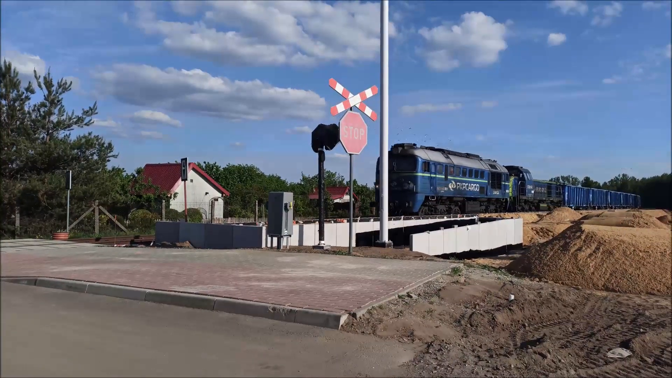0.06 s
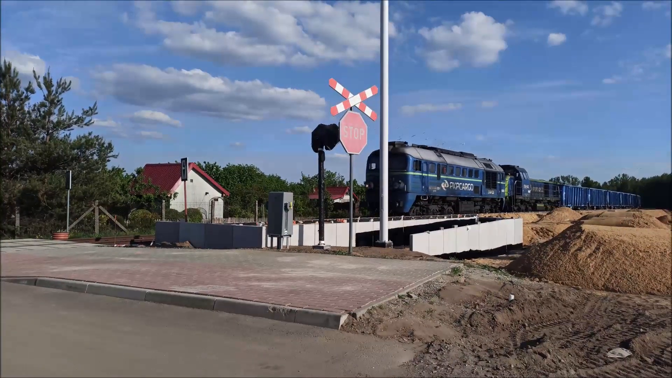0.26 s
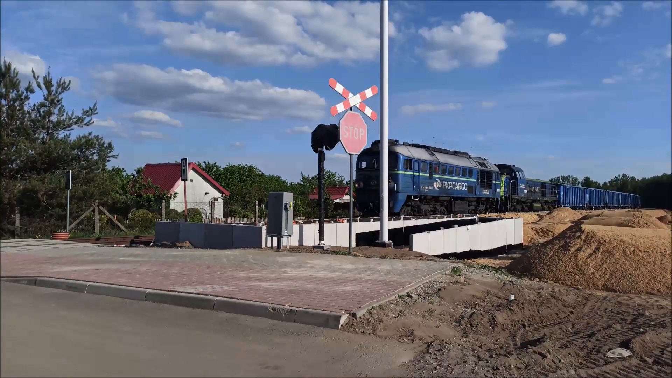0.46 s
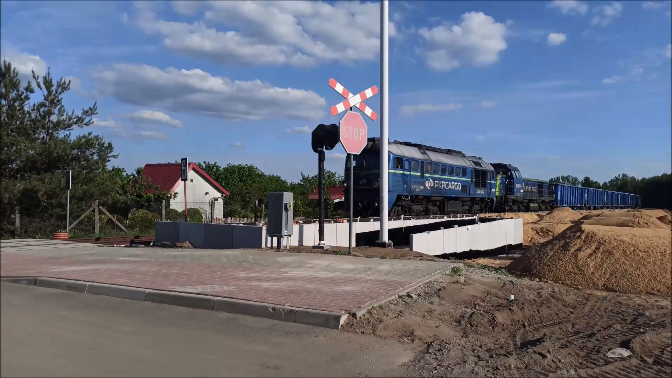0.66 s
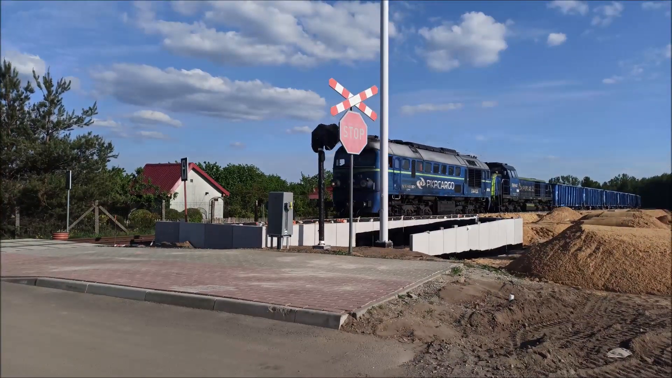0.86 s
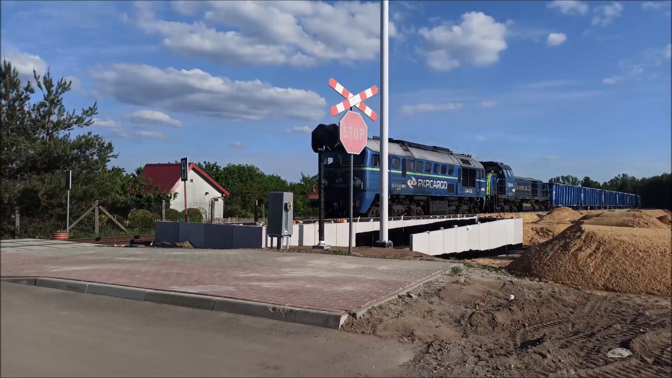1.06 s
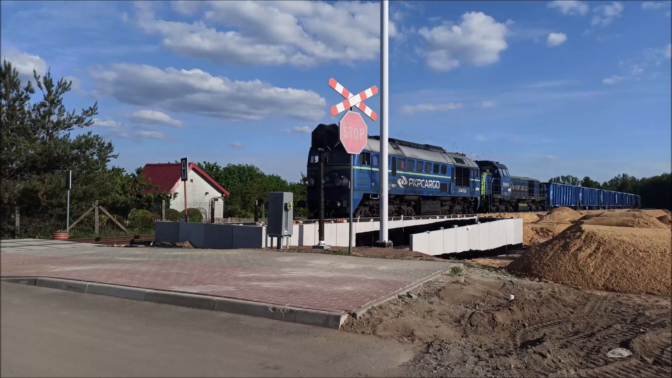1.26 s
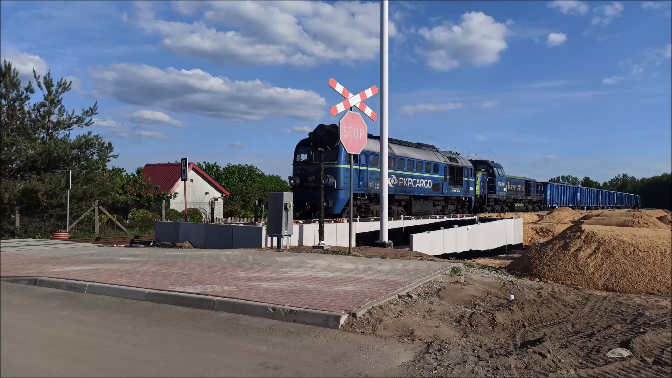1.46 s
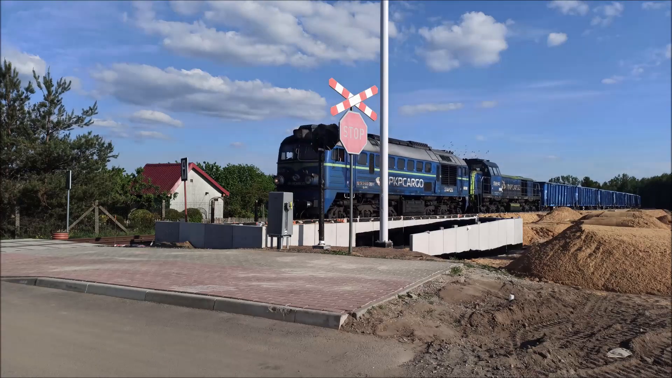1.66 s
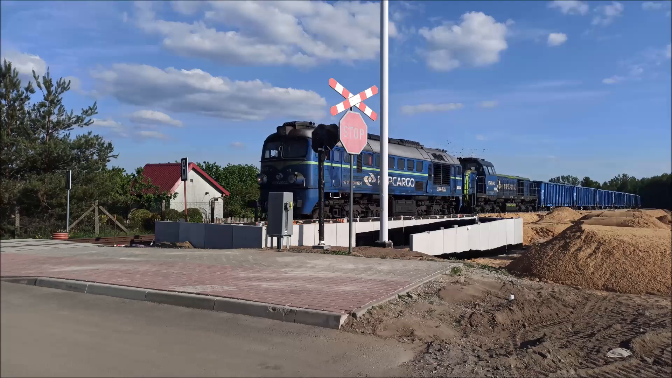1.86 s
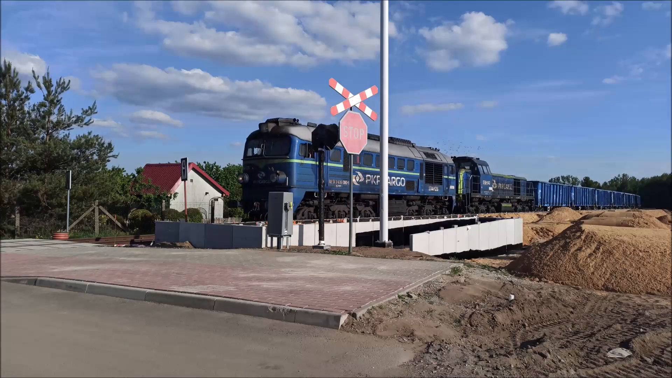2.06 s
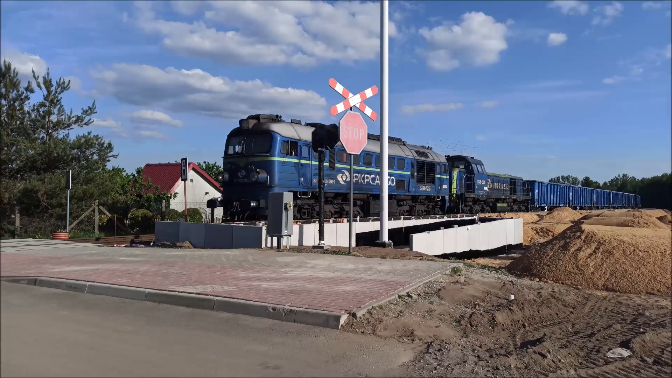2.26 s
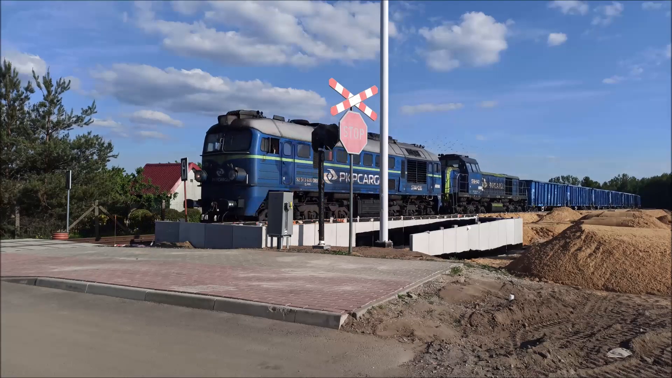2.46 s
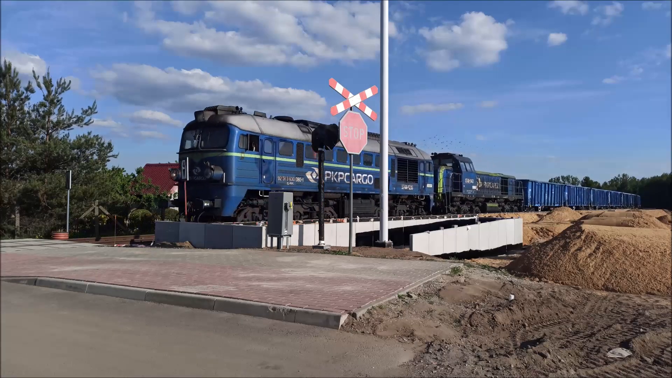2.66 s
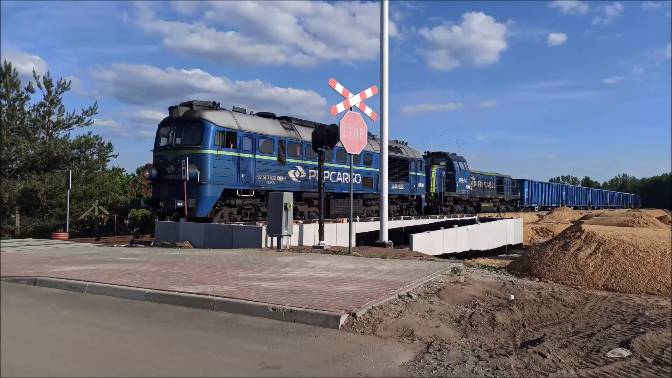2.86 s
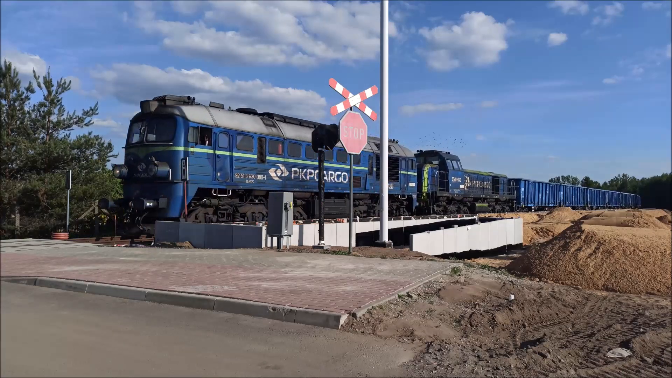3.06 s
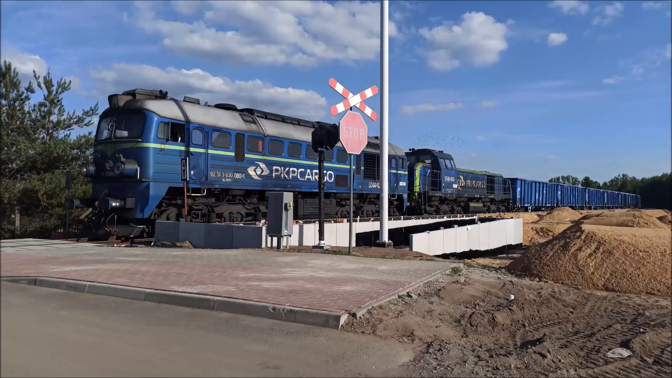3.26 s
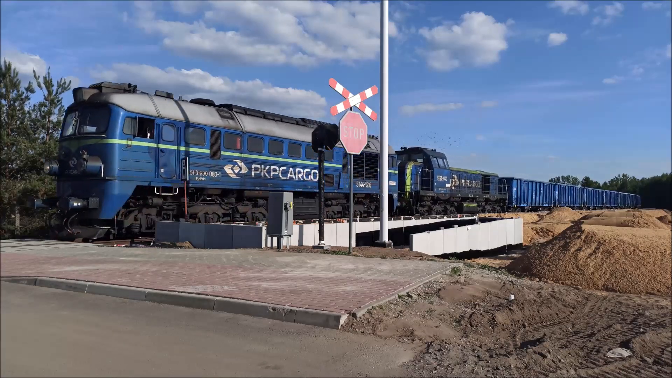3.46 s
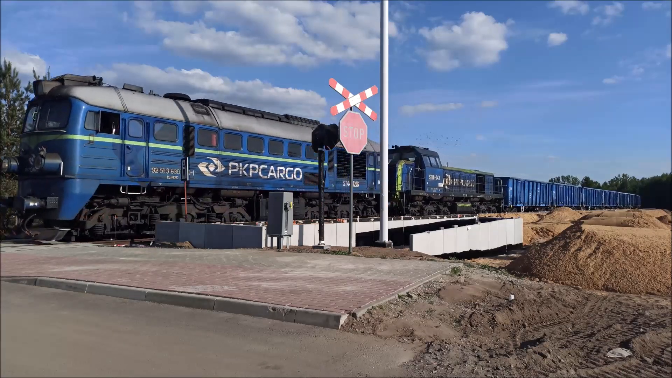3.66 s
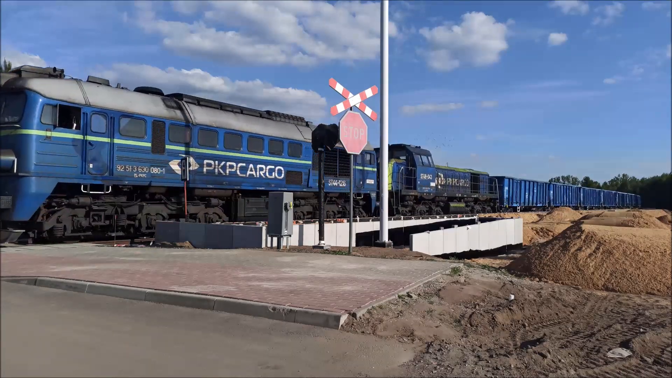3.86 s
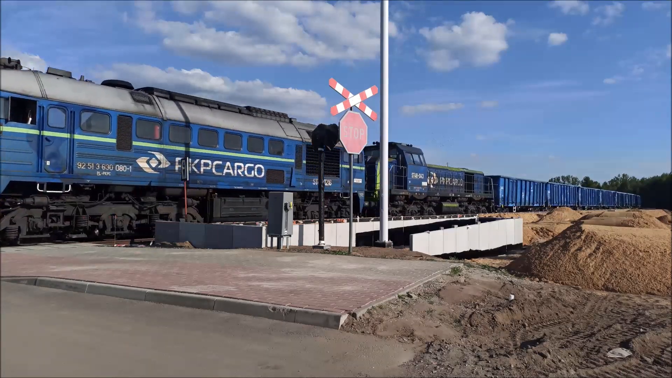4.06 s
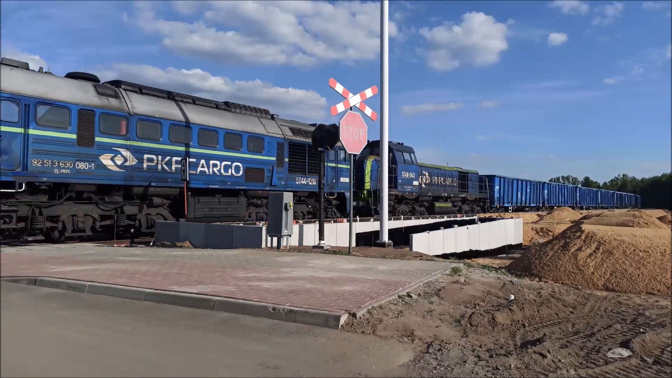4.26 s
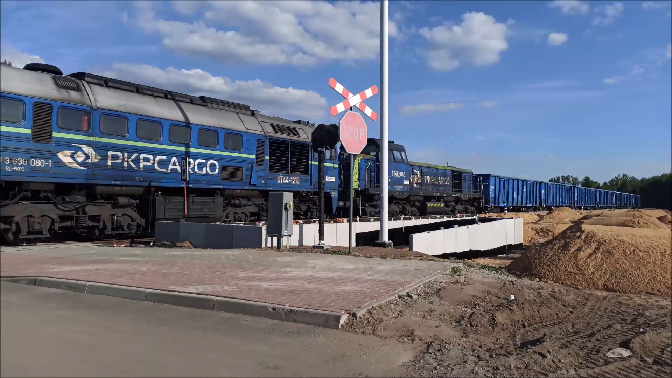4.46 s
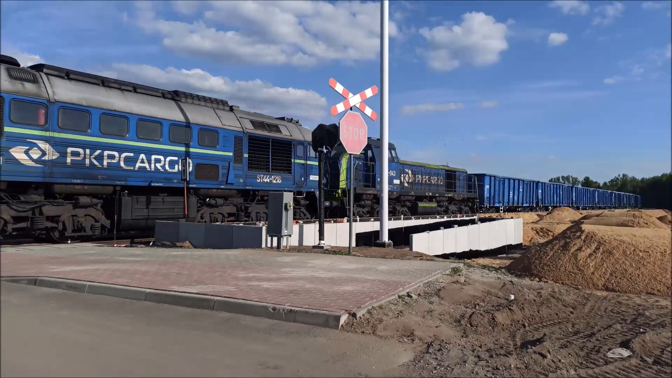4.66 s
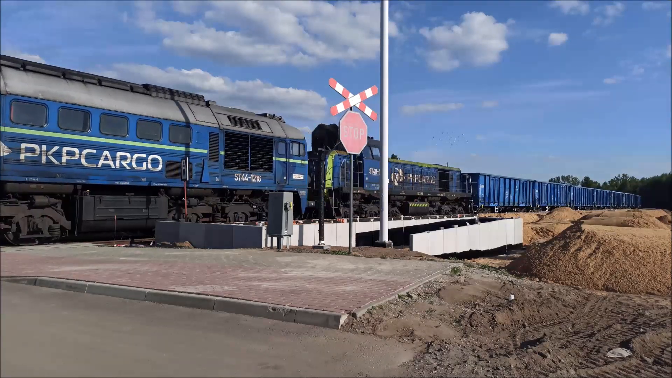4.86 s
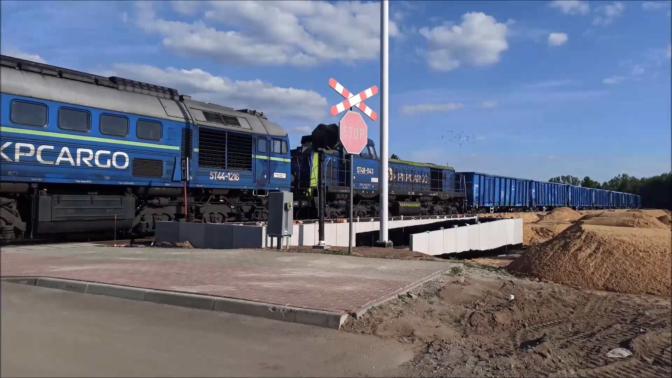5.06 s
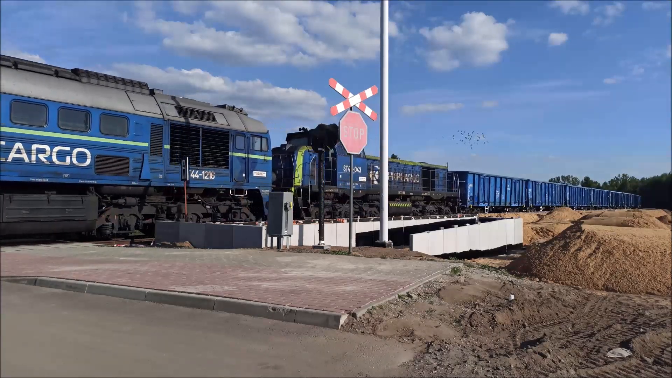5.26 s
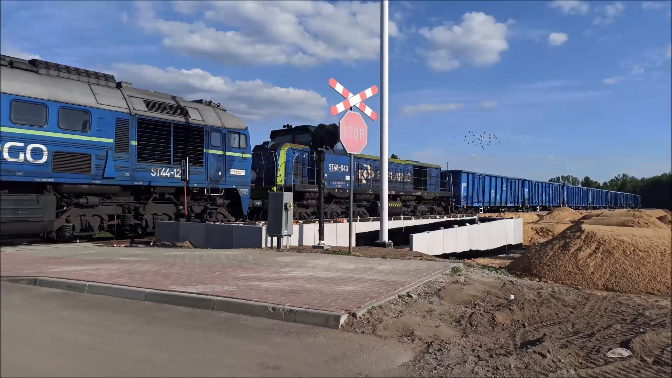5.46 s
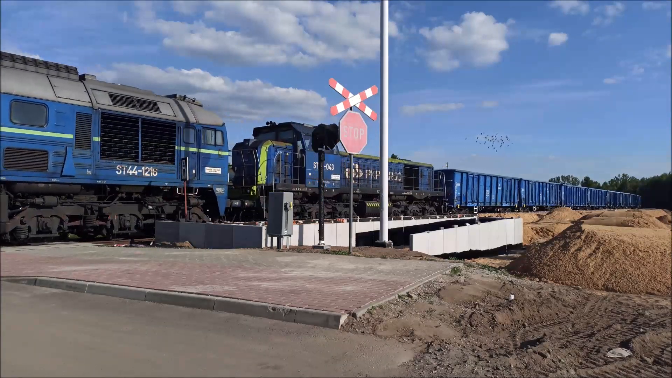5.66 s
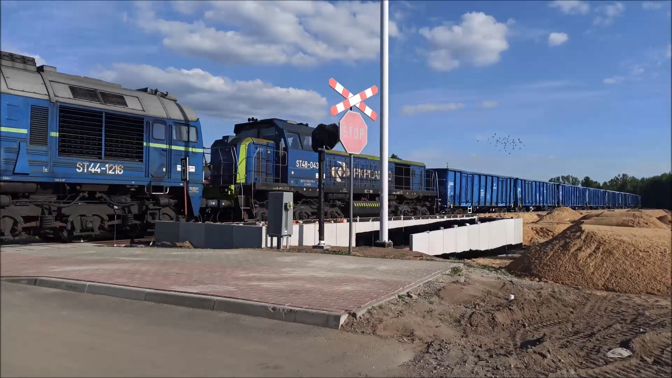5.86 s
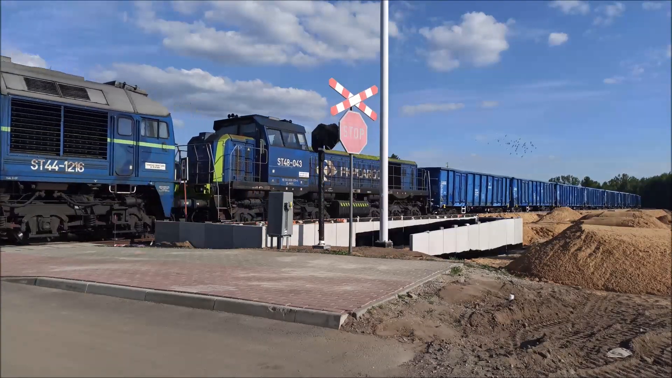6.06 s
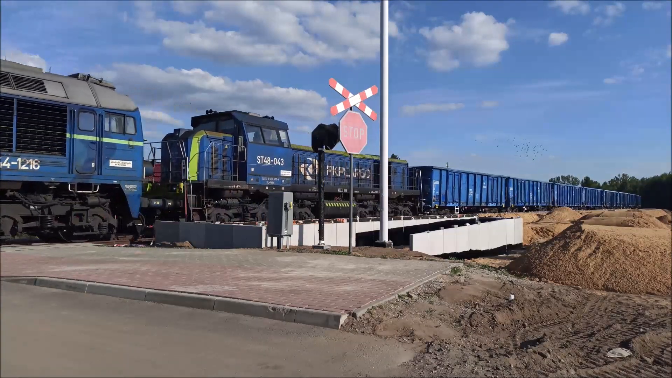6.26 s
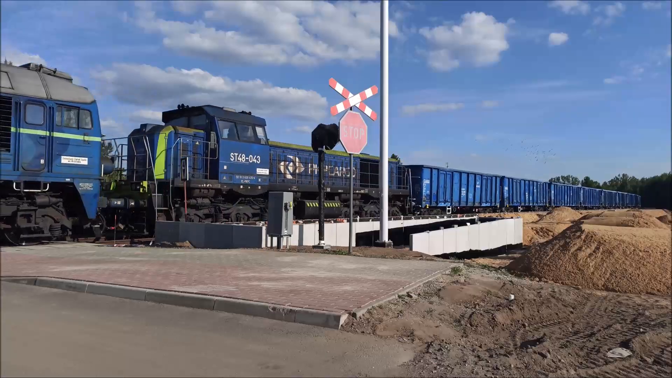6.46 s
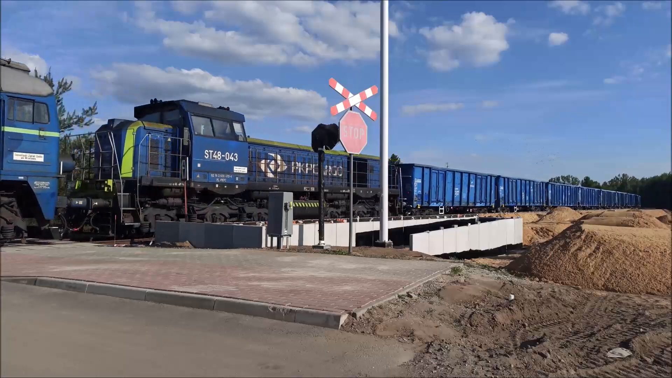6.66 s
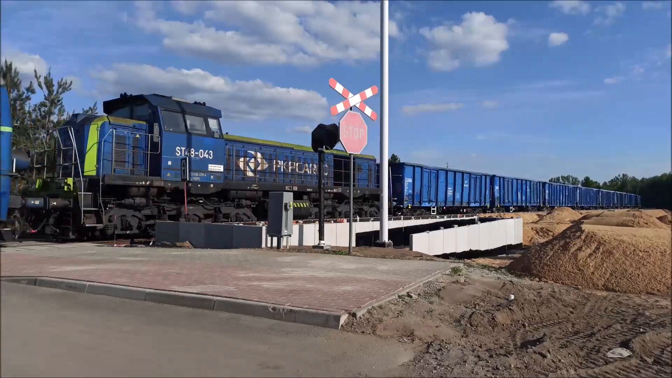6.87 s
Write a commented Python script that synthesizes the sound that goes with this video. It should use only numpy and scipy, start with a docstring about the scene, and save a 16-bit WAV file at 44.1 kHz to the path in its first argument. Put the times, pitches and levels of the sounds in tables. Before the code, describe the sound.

A diesel freight train approaches a level crossing, its low engine drone swelling into a heavy throbbing rumble with rolling wheels, dry ticks and faint rail squeaks.

```python
"""A level crossing: a diesel freight train draws near and rolls past from right to left, heard on a phone.
Exhaust rumble, body drone, rolling wheels and fan hiss are shaped noises that swell as their distance shrinks.
Wavering sines make the firing tone, the boom and the hums; narrow noise makes a panel ring.
Dry ticks (noise bursts through modes) and a faint high whistle from the rails (narrow noise) sit on top,
over a steady hiss and breeze."""
import sys
import numpy as np
from scipy import signal
from scipy.fft import rfft, irfft, next_fast_len
from scipy.io import wavfile
from scipy.ndimage import uniform_filter1d, map_coordinates

SR = 44100
rng = np.random.default_rng(int(sys.argv[2]) if len(sys.argv) > 2 else 0)


def magnitude_from_level(level_db):
    """Linear magnitude for a level in decibels (20 dB per decade)."""
    exponent = np.asarray(level_db, float) / 20
    return 10 ** exponent


def store_pcm(level_fs):
    """Save levels as 16-bit WAV."""
    pcm = np.round(np.clip(level_fs, -1, 1) * 32767).astype(np.int16)
    wavfile.write(sys.argv[1], SR, np.atleast_2d(pcm).T)


N = 305172
T = np.arange(N) / SR
SIZE = next_fast_len(N)
HZ = np.maximum(np.fft.rfftfreq(SIZE, 1 / SR), 1)


def columns(table):
    """Columns of a table, one value per sample, and a gate that is shut outside its span."""
    s, *rest = np.transpose(table)
    gate = np.clip(np.minimum(T - s[0] + 0.03, s[-1] + 0.051 - T) * 10, 0, 1)
    return [np.interp(T, s, c) for c in rest] + [gate]


def over_hz(points):
    """Table values at every FFT bin, interpolated over log frequency."""
    hz, value = np.transpose(points)
    return np.interp(np.log(HZ), np.log(hz), value)


def shape(x, gain):
    """Zero-phase filter: scales the spectrum by a gain per bin."""
    return irfft(rfft(x, SIZE) * gain, SIZE)[..., :N]


def unit(x):
    """Scales to an rms of 1."""
    return x / np.sqrt(np.mean(x ** 2))


def walk(rate_hz):
    """Random levels held 1 / rate_hz and slewed twice; spread near 1."""
    hold = int(SR / rate_hz)
    steps = np.repeat(rng.standard_normal(N // hold + 1), hold)
    slewed = uniform_filter1d(uniform_filter1d(steps, hold), hold)
    return 1.51 * slewed[:N]


def swell(start_s, end_s):
    """Rises from silence and falls back between two moments."""
    return np.sin(np.pi * np.clip((T - start_s) / (end_s - start_s), 0, 1)) ** 1.3


def narrow_noise(hz, rate_hz):
    """Noise in a narrow band: a carrier times a slow complex random walk."""
    slow = walk(rate_hz) + 1j * walk(rate_hz)
    return np.real(slow * np.exp(2j * np.pi * np.cumsum(hz + 0 * T) / SR))


def tone(hz, db, waver_db, rate_hz):
    """A sine whose level and phase waver."""
    waver_rad = 0.35
    level = np.sqrt(2) * magnitude_from_level(db + waver_db * walk(rate_hz))
    return level * np.sin(2 * np.pi * np.cumsum(hz) / SR + waver_rad * walk(rate_hz))


def air():
    """Steady hiss of open air and microphone, and low breeze rumble, unrelated in the two ports."""
    # hiss colour: (frequency [Hz], relative level per Hz [dB])
    hiss_colour = [(1500, -23.5), (3000, -0.5), (8000, -10.5), (12000, 3.5), (16000, 7.5)]
    # breeze colour: (frequency [Hz], relative level per Hz [dB])
    breeze_colour = [(30, -23), (60, -5.5), (110, 4), (200, -11.5), (400, -24.5), (800, -53.5)]
    out = 0
    for colour, rms_db in [(hiss_colour, -63), (breeze_colour, -43.5)]:
        noise = rng.standard_normal((2, N))
        out = out + magnitude_from_level(rms_db) * unit(shape(noise, magnitude_from_level(over_hz(colour))))
    return out


def whistle():
    """Rail whistles and squeaks: fluttering patches of narrow noise, from the right."""
    # patches: (start [s], end [s], centre [Hz], peak before flutter and pan [dB])
    patch_table = [(2.02, 2.13, 14800, -50), (3.24, 3.5, 14900, -59), (3.72, 4.1, 14800, -44),
                   (3.8, 4.05, 5750, -60), (5.1, 5.18, 14600, -43), (5.222, 5.308, 14800, -48),
                   (5.796, 6.144, 14600, -51), (5.815, 5.84, 5800, -44), (6.197, 6.723, 14700, -44)]
    patches = sum(magnitude_from_level(db) * swell(start, end) * narrow_noise(hz, 500) for start, end, hz, db in patch_table)
    left_minus_right_db, flutter_db = -13, 3.5
    pan_db = np.array([[left_minus_right_db], [-left_minus_right_db]]) / 2
    return patches * magnitude_from_level(flutter_db * walk(40) + pan_db)


def ticks():
    """Dry cracks with a short noisy tail, through one set of modes; some ring lower than others."""
    # ticks; the soft ones are all tail:
    # (time [s], drive [dB], extra drive of the low modes [dB], left minus right [dB])
    tick_table = [(0.0553, -16.5, -2, 5.5), (0.0642, -32.5, 8, 4), (0.1278, -38, 8, 1), (2.2277, -36, 4, 8),
                  (2.2546, -40, -8, 6), (2.9617, -53, 23, -2), (2.972, -48, 20, 2), (3.0104, -50, 22, 4),
                  (3.052, -49, 21, 3), (3.5712, -30.5, 1, 5), (4.884, -30, -5, 6), (4.9105, -22, -5, 6.5),
                  (4.914, -26, -3, 9), (4.9274, -32, -3, 8), (4.952, -27.5, -4, 7),
                  (4.9813, -26.5, -16, 13.5), (4.987, -20, -4, -1), (4.9993, -19, -1, 6),
                  (5.0104, -27, -1, 1.5), (5.8627, -24, -3, 5)]
    # modes: (frequency [Hz], width [Hz], gain [dB])
    modes = [(2680, 300, -4), (3650, 330, 6.5), (4300, 630, 2), (6800, 490, 0.5), (7450, 640, 8),
             (8700, 390, -0.5), (11800, 2000, 0), (14500, 4000, 4.5)]
    soft_below_db, hard_t60_s, soft_t60_s = -45, 0.037, 0.079
    attack_s, crack_decay_s = 0.00028, 0.00061
    t = np.arange(4000) / SR
    drive = np.zeros((2, 2, N))  # low or high modes, port, sample
    for s, db, low_db, pan_db in tick_table:
        hard = db > soft_below_db
        t60_s = hard_t60_s if hard else soft_t60_s
        tail = 0.5 * np.exp(-t * np.log(1000) / t60_s)
        envelope = np.minimum(t / attack_s, 1) * (hard * np.exp(-t / crack_decay_s) + tail)
        grain = rng.standard_normal((3, len(t)))
        partly_shared = 0.65 * grain[0] + 0.83 * grain[1:]
        hit = magnitude_from_level(db + np.array([[pan_db], [-pan_db]]) / 2) * envelope * partly_shared
        first = int(s * SR)
        drive[..., first:first + len(t)] += np.array([hit * magnitude_from_level(low_db), hit])
    out = 0
    for hz, width_hz, db in modes:
        b, a = signal.iirpeak(hz, hz / width_hz, SR)
        out = out + magnitude_from_level(db) * signal.lfilter(b, a, drive[int(hz > 5000)])
    return out


def resonance():
    """The ringing panel: narrow noise that swells once."""
    return swell(5.17, 6.21) * magnitude_from_level(-30) * narrow_noise(658, 90)


def hums():
    """Machinery tones that come and go, and one that climbs in pitch and level."""
    # strands: (start [s], end [s], frequency [Hz], peak before waver [dB])
    strands = [(-.3, 1.6, 71.5, -37), (1.4, 3.4, 71, -35), (-.3, 1.3, 318.5, -41), (1.6, 2.9, 378, -38),
               (2.6, 3.4, 318, -36), (3.2, 4.0, 140, -33), (3.9, 4.7, 152, -31), (3.2, 3.95, 318, -33),
               (-.2, .6, 1445, -52), (1.3, 2.6, 1430, -50), (1.6, 2.1, 1608, -50), (4.1, 4.95, 910, -44),
               (4.4, 5.0, 1175, -44), (4.5, 5.3, 364.5, -32), (4.8, 5.25, 320, -30), (5.15, 5.55, 404, -29),
               (5.3, 5.5, 331, -31), (5.4, 6.05, 705, -31), (5.45, 5.9, 205.5, -28), (5.5, 5.9, 600, -34),
               (5.55, 5.9, 1090, -42), (5.85, 6.35, 1152, -41), (6.1, 6.9, 552.5, -36),
               (6.35, 6.65, 941, -34), (6.55, 7.1, 2400, -45), (6.7, 7.1, 778, -35)]
    since_s = T - 5.5
    climb_hz = np.clip(337 + 66 * since_s, 337, 424)
    climb_db = -32 + 3.5 * since_s
    fade_s = 0.2
    out = np.clip(since_s / fade_s, 0, 1) * tone(climb_hz, climb_db, 2.8, 11)
    for start, end, hz, db in strands:
        out += swell(start, end) * tone(hz + 0 * T, db, 1.4, 11)
    return out


def firing():
    """The firing tone with the even multiples that the body lets through, and the boom just below it."""
    # levels before waver: (time [s], firing tone [dB], 2nd multiple [dB], 4th multiple [dB])
    firing_levels = [(5.95, -50, -40, -42), (6.18, -40, -21.5, -26), (6.34, -22, -21, -30),
                     (6.46, -22, -21, -28), (6.57, -15.5, -30, -24), (6.68, -14, -24, -27),
                     (6.78, -20, -21, -26), (6.92, -38, -30, -36)]
    # deep exhaust boom: (time [s], frequency [Hz], level before waver [dB])
    boom_track = [(4.95, 108, -34), (5.17, 107, -19), (5.3, 104.5, -18.5), (5.6, 108.5, -20.5),
                  (5.82, 108.5, -17.5), (5.96, 104, -36), (6.08, 101, -21), (6.2, 101.5, -20),
                  (6.3, 104, -30)]
    first_db, second_db, fourth_db, gate = columns(firing_levels)
    hz = 110.6 + 0 * T
    multiples = tone(hz, first_db, 0.6, 8)
    multiples += tone(2 * hz, second_db, 0.6, 6)
    multiples += tone(4 * hz, fourth_db, 1.2, 8)
    boom_hz, boom_db, boom_gate = columns(boom_track)
    return gate * multiples + boom_gate * tone(boom_hz, boom_db, 1.6, 12)


def arriving_noise():
    """Rows: the direct wave, then scattered sound for the left and right port."""
    # power share that arrives scattered, unlike in the two ports: (frequency [Hz], share [0-1])
    scatter = [(100, 0.01), (300, 0.03), (700, 0.15), (1400, 0.56), (3000, 0.96), (8000, 0.89)]
    share = np.clip(over_hz(scatter), 0, 1)
    return shape(rng.standard_normal((3, N)), np.sqrt([1 - share, share, share]))


def passing_db():
    """Level of each broad source as its distance shrinks; rumble and drone surge on top."""
    # exhaust rumble, body drone, wheels, fans:
    # (closest [s], level then before surges [dB], distance then [m], loss per tenfold distance [dB])
    sources = [(5.7, -26, 4.45, 20.1), (6.1, -25.5, 4.38, 30.3), (6.5, -28, 5.45, 22.4),
               (6.6, -34, 8.65, 31.55)]
    # surges: (middle [s], length [s], extra rumble [dB], extra drone [dB])
    surges = [(.5, .6, 1, 1), (1.55, 0.83, 2, -0.5), (2.328, 0.66, -1.5, 2.5), (3.353, 0.55, 1.5, -1.5),
              (3.645, 0.63, 0.5, 3), (4.05, 0.29, 3, -2.5), (4.456, .4, -1, 0.5), (4.853, 0.43, 2.5, 1.5),
              (6.003, 0.34, 1.5, -0.5)]
    speed_m_s = 5
    levels = []
    for closest_s, db, closest_m, loss_db in sources:
        distance_m = np.hypot(speed_m_s * (T - closest_s), closest_m)
        levels.append(db - loss_db * np.log10(distance_m / closest_m))
    levels = np.array(levels)
    for middle_s, length_s, *extra_db in surges:
        levels[:2] += np.outer(extra_db, swell(middle_s - length_s / 2, middle_s + length_s / 2))
    return levels


def roar(closeness):
    """Four broad sources; the lower three change colour as first the front, then the engine room comes close."""
    # colours from afar, from the front and beside the engine room, and of the fan hiss:
    # (frequency [Hz], relative level per Hz within a source [dB])
    far_colour = [(18, -61), (30, -44), (53, -15), (81, -5), (209, -12.5), (310, 0), (339, -5.5),
                  (371, -4.5), (444, -19), (513, -14), (660, -24.5), (748, -21.5), (963, -25), (1400, -24),
                  (2200, -34), (2860, -67), (4840, -120)]
    front_colour = [(18, -54.5), (30, -35.5), (60, 0.5), (102, 8), (151, 2), (225, -4.5), (371, -3),
                    (452, -21), (504, -14), (648, -15.5), (980, -22.5), (1380, -20), (2200, -31.5),
                    (2860, -62), (4840, -120)]
    near_colour = [(18, -66.5), (30, -33), (55, -9), (70, 3), (150, -3.5), (235, -3), (270, -5.5),
                   (310, -8), (400, -3), (450, -3), (480, -17), (720, -12), (790, -18.5), (940, -14),
                   (1000, -24.5), (1560, -21), (2200, -35)]
    hiss_colour = [(1000, -38), (1700, -7), (2180, -4.5), (3660, -4.5), (4650, -8), (4900, -16),
                   (5950, -16), (6200, -10.5), (7600, -11), (7800, -18.5), (8600, -21), (12000, -21),
                   (16000, -7.5)]
    # edges between rumble, drone, rolling and hiss: frequency [Hz]
    edges_hz = [190, 480, 1900]
    # narrow resonances of wheels and rail: (frequency [Hz], width [Hz], relative boost [dB])
    rail_modes = [(561, 9.3, 3), (792, 17, 4.5), (899, 12, 6.5), (1128, 30, 5), (1395, 19, 3.5),
                  (2263, 67, 5), (3040, 12, 8)]
    noise = arriving_noise()
    below = [0] + [1 / (1 + (HZ / hz) ** 12) for hz in edges_hz] + [1]
    rail = magnitude_from_level(sum(db / (1 + (2 * (HZ - hz) / width_hz) ** 2) for hz, width_hz, db in rail_modes))
    shares = [np.maximum(1 - np.abs(closeness - stage), 0) for stage in range(3)]
    out = 0
    for k, db in enumerate(passing_db()):
        band = rail * np.sqrt(np.maximum(below[k + 1] - below[k], 0))
        colours = [hiss_colour] * 3 if k == 3 else [far_colour, front_colour, near_colour]
        mix = 0
        for share, colour in zip(shares, colours):
            mix = mix + share * unit(shape(noise, band * magnitude_from_level(over_hz(colour))))
        # sqrt(3/2): three rows feed two ports
        out = out + np.sqrt(3 / 2) * mix * magnitude_from_level(db + 0.57 * walk(9))
    return out


def scene():
    """The train reaches one port of the phone before the other, by its bearing; the other layers are added."""
    # (time [s], closeness [0 far, 1 front of the locomotive level with us, 2 engine room; held at 2])
    path = [(0, 0.068), (3.2, 0.32), (4, 1.09), (4.8, 1.27), (5.5, 1.2), (6.1, 1.6), (6.7, 2.2)]
    # (time [s], bearing of the loudest part to the right [degrees])
    bearing = [(0, 10.5), (1.5, 14.5), (3, 3), (5.2, -39.5), (6.92, -56)]
    side = np.sin(np.radians(columns(bearing)[0]))
    train = roar(np.clip(columns(path)[0], 0, 2))
    train[0] += firing() + hums() + resonance()
    # a broad bump in the treble opens up
    open_s, rise_s, open_db, open_hz = 4.5, 0.41, 1, 2640
    opened = np.clip((T - open_s) / rise_s + 0.5, 0, 1)
    bump = np.exp(-(np.log(HZ / open_hz) / 0.33) ** 2)
    train += (magnitude_from_level(open_db * opened) - 1) * shape(train, bump)
    port_gap_m, sound_m_s = 0.145, 343
    half_lag_samples = side * port_gap_m / sound_m_s * SR / 2
    direct = [map_coordinates(train[0], [np.arange(N) + way * half_lag_samples], order=3, mode="nearest")
              for way in (-1, 1)]
    heard = np.array(direct) + train[1:]
    # the phone's body shades the far port in the treble
    treble = shape(heard, 1 / (1 + (2500 / HZ) ** 2))
    heard += treble * (magnitude_from_level(2.7 * np.array([-side, side])) - 1)
    return heard + ticks() + whistle() + air()


def roll_off(x):
    """The treble ends steeply here."""
    return signal.sosfilt(signal.butter(12, 16440, fs=SR, output="sos"), x)


def record(dry):
    """Microphone colour: flat below the first point, deaf in a band of the treble."""
    # (frequency [Hz], response, used relative to the first row [dB])
    mic = [(8550, -10), (8750, -20), (9400, -37), (11300, -50), (11600, -19), (15600, -33), (16200, -61.5)]
    mix = shape(dry, magnitude_from_level(over_hz(mic) - mic[0][1]))
    return roll_off(mix)


dry = scene()
out = record(dry)
store_pcm(out)
```